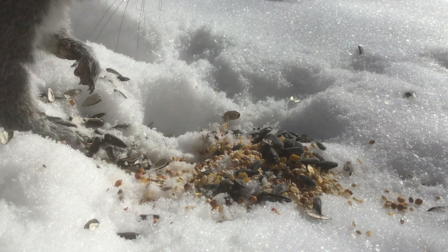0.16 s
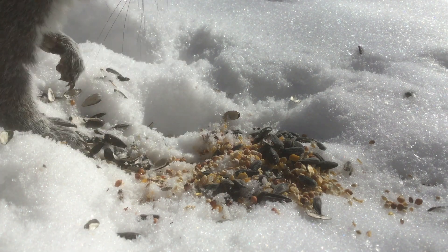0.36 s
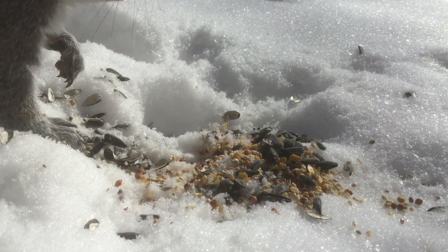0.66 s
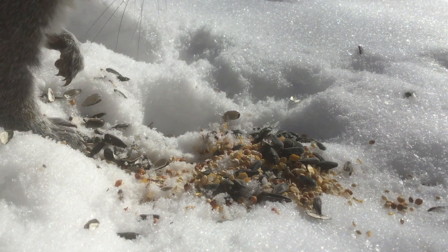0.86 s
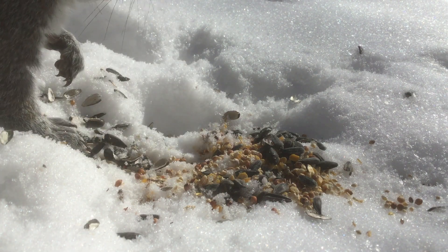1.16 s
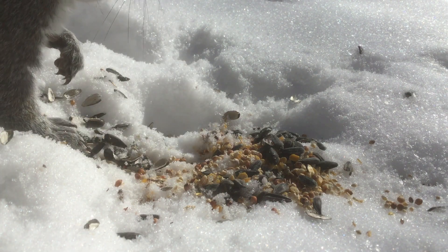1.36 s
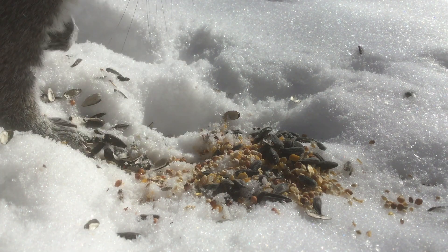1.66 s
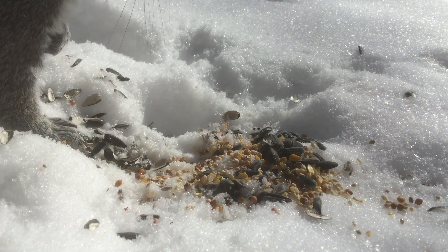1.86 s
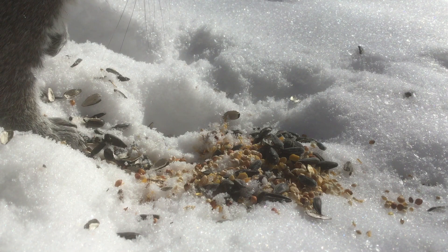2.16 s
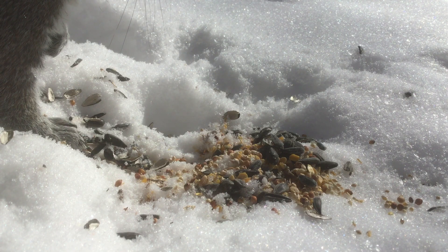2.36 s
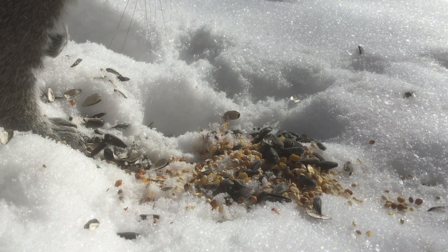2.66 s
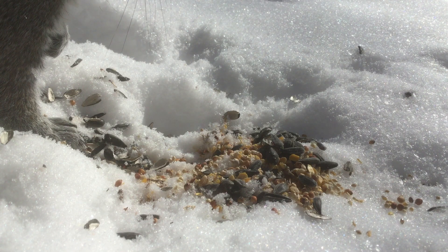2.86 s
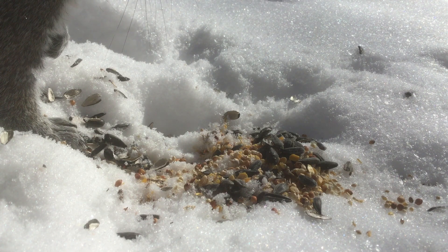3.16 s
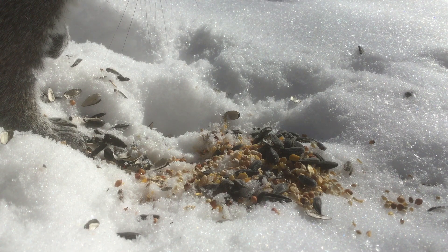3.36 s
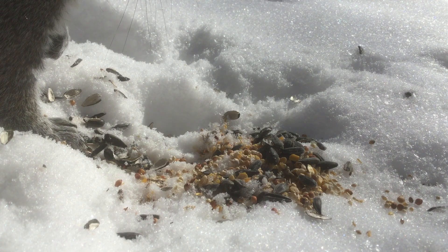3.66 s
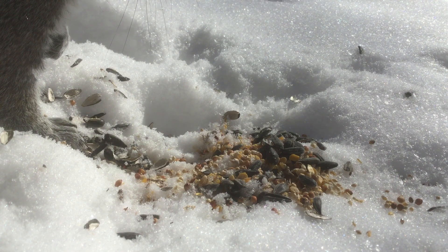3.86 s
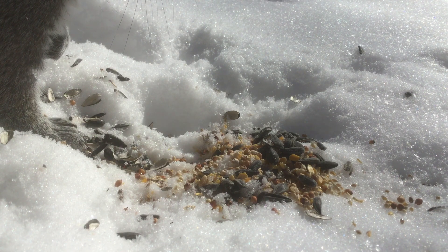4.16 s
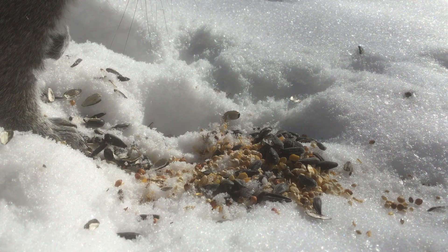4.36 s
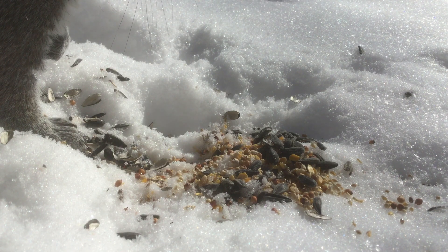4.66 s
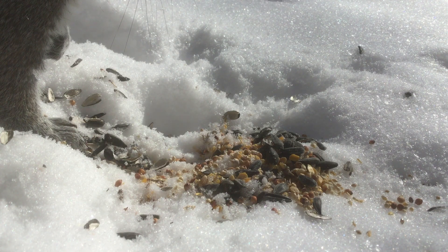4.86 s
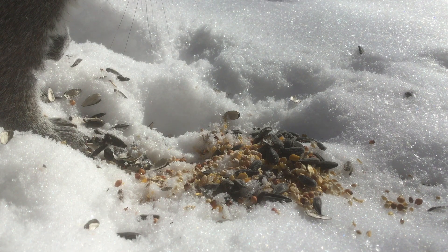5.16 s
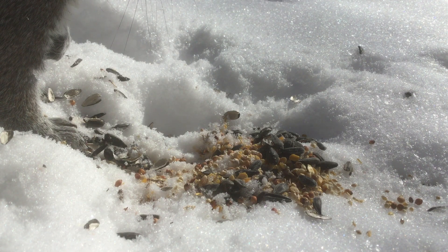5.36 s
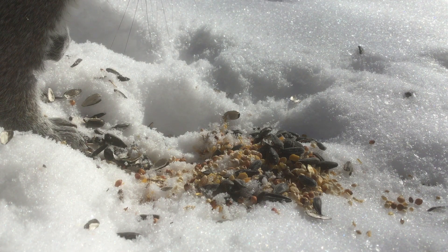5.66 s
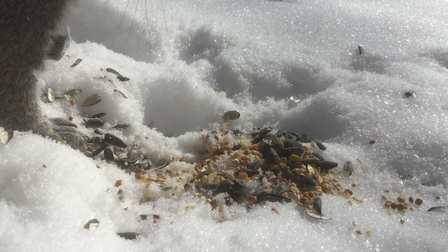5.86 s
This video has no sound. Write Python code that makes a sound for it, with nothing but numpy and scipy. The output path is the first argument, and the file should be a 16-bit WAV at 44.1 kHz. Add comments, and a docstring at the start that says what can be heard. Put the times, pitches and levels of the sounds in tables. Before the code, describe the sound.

Open air over snow, with the microphone right beside a feeding squirrel. A low, unsteady rumble with small wind puffs and a faint even hiss runs throughout. In the first 0.3 s husks snap and rustle, with a tiny high squeak; snow crunches faintly at 0.4. More light cracks and squeaks come at 0.7-1.2, with a short low peep at 1.0. A bird further off gives harsh arched chirps at 1.2-1.5. Soft squeaks and falling peeps follow at 1.7-2.2, then snaps at 2.3-2.5. From 3.1 to 3.75 feeding is busiest: sharp cracks, dry rustles, crust crunches and squeaks. A thin, very high bird note sounds at 3.8. Strong snaps at 4.07 meet a short, rough, low moan at 4.1-4.3. A crack and clearer squeak come at 4.45, a faint far note at 4.5, then near quiet until a final cluster of snaps, squeak and wind puff at 5.5-5.7.

```python
"""Out in the snow, the microphone right beside a squirrel feeding on seeds, birds calling further off.
High scooped squeaks, from a squirrel or a small bird, and lower peeps sound close by as arched whistles.
The squirrel moans once, a harmonic voice roughened by strain; husks snap and rustle under teeth and paws
and the crust crunches: bursts of tiny impacts ring resonances. Far birds chirp and pipe, built from sines.
Shaped noise lies under it all: a low outdoor rumble with puffs of wind, and a soft hiss."""
import sys
import numpy as np
from scipy import signal
from scipy.fft import rfft, irfft
from scipy.io import wavfile
from scipy.ndimage import uniform_filter1d, map_coordinates

SR = 44100
rng = np.random.default_rng(int(sys.argv[2]) if len(sys.argv) > 2 else 0)


def transcribe(u):
    """Save the signal u as a 16-bit wav file named by the first command-line argument.

    u: samples, shape (n,) or (channels, n), limited to [-1, 1]; the rate is SR.
    q: integer samples, one column per channel.
    """
    v = np.clip(np.atleast_2d(u).T, -1, 1)
    q = np.round(v * 32767).astype(np.int16)
    wavfile.write(sys.argv[1], SR, q)


N = 265482
TIME = np.arange(N) / SR
TOP_HZ = 16000  # upper limit of the recorder


def undb(db):
    """Decibels to gain."""
    return 10 ** (np.asarray(db) / 20)


def unit(x):
    """Scale to rms 1."""
    return x / np.sqrt(np.mean(x ** 2) + 1e-20)


def add(out, s, x):
    """Mix x into out at time s."""
    i = max(int(s * SR), 0)
    out[i:i + len(x)] += x[:len(out) - i]


def clock(length):
    """Times [s] from 0 through a sound of this length [s]."""
    return np.arange(int(length * SR)) / SR


def turn(hz):
    """Phase [rad] of an oscillation whose pitch follows hz."""
    return 2 * np.pi * np.cumsum(hz) / SR


def wander(n, rate):
    """Smooth chance from knots of spread 1, drawn rate times a second."""
    knots = np.arange(n) * rate / SR
    draws = rng.standard_normal(int(knots[-1]) + 3)
    return map_coordinates(draws, [knots], order=3, mode="nearest")


def gate(t, length, rise, fall):
    """A smooth opening and closing."""
    opening = np.sin(np.pi / 2 * np.clip(t / rise, 0, 1))
    closing = np.sin(np.pi / 2 * np.clip((length - t) / fall, 0, 1))
    return opening * closing


def colour(x, points):
    """Give x a spectrum of (Hz, dB) points with steep ends, at rms 1."""
    hz, db = np.transpose(points)
    f = np.maximum(np.fft.rfftfreq(len(x), 1 / SR), 1)
    gain = undb(np.interp(np.log(f), np.log(hz), db))
    gain = gain / (1 + (f / hz[-1] / 1.15) ** 16) / (1 + (hz[0] / f) ** 4)
    return unit(irfft(rfft(x) * gain, len(x)))


def ring(x, modes):
    """Pass x through (Hz, width, dB) resonances; a small body radiates little below its lowest one."""
    out = 0
    for hz, width, db in modes:
        b, a = signal.iirpeak(min(hz, TOP_HZ), hz / width, fs=SR)
        out = out + undb(db) * signal.lfilter(b, a, x)
    lowest = min(m[0] for m in modes)
    return signal.sosfilt(signal.butter(2, 0.87 * lowest, "high", fs=SR, output="sos"), out)


def piece(modes, scatter_share=0.38, narrowing=0.2, uneven_db=3):
    """One piece's own modes: three narrow ones scattered about each broad resonance."""
    chance = rng.standard_normal((len(modes), 3, 2))
    own = []
    for (hz, width, db), draws in zip(modes, chance):
        for k, (a, b) in enumerate(draws):
            own_hz = max(hz + width * (scatter_share * a + (k - 1) / 2), 200)
            own.append((own_hz, width * narrowing, db + uneven_db * b))
    return own


def grains(n, rate, spread_db):
    """Random tiny impacts of very unequal size, about rate of them a second."""
    sizes = undb(spread_db * np.minimum(rng.exponential(size=n), 4))
    return (rng.random(n) < rate / SR) * rng.choice([-1, 1], n) * sizes


def cloud(length, modes, rate, spread_db):
    """A short burst of grains that ring one piece with the given modes."""
    t = clock(length)
    burst = unit(ring(grains(len(t), rate, spread_db), piece(modes)))
    return burst * gate(t, length, 0.0018, 0.0053)


SCOOP_S = 0.00434  # decay time of the opening scoop
WHISTLE_ATTACK_S = 0.015  # at most; a very short whistle rises for half its length


def arch(t, scoop, sag, sag_bend=1.46):
    """Pitch as a share of its top: a quick scoop up, then a sag that steepens."""
    return 1 - scoop * np.exp(-t / SCOOP_S) - sag * (t / t[-1]) ** sag_bend


def whistle(t, hz, octave_db, under_db, rasp, waver=0.004, rasp_depth=0.026, rasp_rate=650,
            flutter_db=3.0, overtone_db=-14):
    """A thin whistle; when forced, the folds shake; it also sounds at thirds of the pitch."""
    hz = hz * (1 + waver * wander(len(t), 177) + rasp * rasp_depth * wander(len(t), rasp_rate))
    phase = turn(hz)
    # (multiple of the pitch, dB)
    partials = [(1, 0), (2, octave_db), (3, octave_db + overtone_db), (4, octave_db + 1.5 * overtone_db)]
    thirds = [(2 / 3, under_db - 7), (4 / 3, under_db - 9), (5 / 3, under_db)]
    voice = sum(undb(d) * np.sin(k * phase) for k, d in partials if k * hz.max() < TOP_HZ)
    slip = wander(len(t), 407)  # the undertones are only loosely locked to the pitch
    voice = voice + sum(undb(d) * np.sin(k * phase + slip) for k, d in thirds)
    flutter = undb(flutter_db * wander(len(t), 133))
    roughness = 1 + .5 * rasp * wander(len(t), rasp_rate)
    attack = min(WHISTLE_ATTACK_S, t[-1] / 2)
    return np.sqrt(2) * voice * flutter * roughness * gate(t, t[-1], attack, 0.0032)


# low rumble all round the microphone, spectrum shape: (frequency [Hz], relative level [dB])
RUMBLE_SPECTRUM = [(12, -67), (20, -37), (30, -39), (46, -8.5), (63, -2.5), (81, -1.5), (115, -3),
                   (155, -10), (189, -10.5), (286, -17), (370, -20), (506, -38.5), (600, -34.5), (780, -78),
                   (1320, -120)]
# soft even hiss of the open air, spectrum shape: (frequency [Hz], relative level [dB])
HISS_SPECTRUM = [(260, -28), (450, -1.5), (500, -4.5), (674, -1), (856, -7), (936, -7), (1040, -7),
                 (1240, -8.5), (2010, -12), (2400, -12), (3000, -12.5), (5300, -13), (5970, -15),
                 (12600, -15), (16000, -27.5)]
# strongest puffs of wind on the microphone: (time [s], rise of the rumble [dB])
WIND_PUFFS = [(.25, 7), (.615, 4), (0.824, 8.5), (0.969, 7), (1.228, 8.5), (1.835, 3.5), (2.742, 3),
              (5.64, 8.5), (5.69, 8)]
PUFF_WIDTH_S = 0.013  # from the peak to where the rise in dB is down to 1/e
RUMBLE_DB, HISS_DB, HISS_WALK_DB = -44, -59, .4


def outdoors(steadiness=0.15, swell_db=1.77, swell_rate=14):
    """A low rumble of noise that swells, sinks and puffs, under an even hiss."""
    rumble = colour(rng.standard_normal(N), RUMBLE_SPECTRUM)
    # partly even out the rumble's own power; it then stirs at random and now and then puffs
    power = uniform_filter1d(rumble ** 2, size=SR // 14)
    rumble = unit(rumble / power ** (steadiness / 2))
    puffs = sum(db * np.exp(-((TIME - s) / PUFF_WIDTH_S) ** 2) for s, db in WIND_PUFFS)
    hiss = colour(rng.standard_normal(N), HISS_SPECTRUM)
    hiss = hiss * undb(HISS_DB + HISS_WALK_DB * wander(N, 6.5))
    return rumble * undb(RUMBLE_DB + swell_db * wander(N, swell_rate) + puffs) + hiss


# loudest husks snapping, close by: (time [s], peak of the sharp edge [dB], peak of the shell's body [dB])
HUSK_SNAPS = [(0.061, -57.5, -40), (0.106, -30.5, -32), (.208, -31.5, -59), (.241, -29, -40),
              (.732, -36.5, -43), (1.02, -37, -35.5), (1.238, -33, -39.5), (2.286, -30.5, -61),
              (2.434, -31, -42), (2.484, -36.5, -52), (3.1497, -21.5, -60), (3.236, -31.5, -33.5),
              (3.267, -29, -45), (3.31, -37, -40.5), (3.401, -24, -61.5), (3.403, -20, -62),
              (3.534, -31, -32), (3.573, -39, -26), (3.596, -33.5, -30.5), (3.62, -39.5, -40),
              (3.658, -30, -28.5), (3.724, -29, -50), (3.734, -34, -50), (4.066, -23, -40),
              (4.075, -18.5, -57.5), (4.447, -35, -34), (5.506, -32.5, -40.5), (5.55, -32.5, -32),
              (5.5641, -25.5, -43), (5.572, -23.5, -31.5), (5.5865, -34, -42)]
# what a husk's body and edge ring with, before each piece scatters and narrows it:
# (frequency [Hz], width [Hz], level [dB])
HUSK_BODY = [(2273, 560, 5.5), (3387, 690, 6.5), (4760, 740, 0.5)]
HUSK_EDGE = [(6100, 1400, -4), (8810, 410, 8), (9550, 1050, 1), (11930, 2440, 4.5)]


def snaps(tear_s=0.00026, after_s=0.0055, after_db=-20, onset_s=0.00034):
    """Each husk splits in a run of tiny fractures, then crumbles briefly; edge and body ring."""
    out, t = np.zeros(N), np.arange(SR // 30) / SR
    force = np.exp(-t / tear_s) + undb(after_db) * np.exp(-t / after_s)
    force = force * (1 - np.exp(-t / onset_s))
    for s, edge_db, body_db in HUSK_SNAPS:
        fractures = rng.laplace(size=(2, len(t))) * force
        edge = ring(fractures[0], piece(HUSK_EDGE))
        body = ring(fractures[1], piece(HUSK_BODY))
        add(out, s, undb(edge_db) * edge / np.abs(edge).max())
        add(out, s, undb(body_db) * body / np.abs(body).max())
    return out


# high scooped squeaks close to the microphone, from a squirrel or a small bird:
# (time [s], length [s], top pitch [Hz], level [dB], octave against the fundamental [dB])
HIGH_SQUEAKS = [(0.156, 0.0623, 6060, -57, 0), (0.807, 0.026, 6080, -65, 14.5),
                (1.022, 0.041, 6070, -50, -1.5), (1.663, 0.052, 6000, -54.5, 3),
                (2.158, .047, 5720, -51, 1.5), (2.420, .044, 5980, -49.5, 1.5), (2.766, .056, 6100, -51, 0),
                (3.098, 0.033, 5990, -49.5, 4.5), (3.361, .035, 5960, -51.5, 2),
                (3.652, 0.031, 5860, -45, 1), (3.978, 0.082, 5980, -46.5, 5),
                (4.444, 0.038, 5494, -39.5, -6), (5.511, 0.055, 5565, -42.5, -3)]
# each scoops up towards its top, then sags part of the way to rest; rasp brings up the undertones
SCOOP_SHARE, SAG_SHARE, SQUEAK_REST_HZ = 0.178, .52, 4866
CLEAN_HZ, RASP_PER_KHZ = 5330, 0.79  # rasp grows with the top pitch above CLEAN_HZ, up to 1
UNDERTONE_DB, UNDERTONE_RASP_DB = -15, 10


def squeaks():
    """High arched whistles; the higher they reach, the further they sag and the more they rasp."""
    out = np.zeros(N)
    for s, length, top, db, octave_db in HIGH_SQUEAKS:
        t = clock(length)
        rasp = np.clip(RASP_PER_KHZ * (top - CLEAN_HZ) / 1000, 0, 1)
        hz = top * arch(t, SCOOP_SHARE, SAG_SHARE * (1 - SQUEAK_REST_HZ / top))
        under_db = UNDERTONE_DB + UNDERTONE_RASP_DB * rasp
        add(out, s, undb(db) * whistle(t, hz, octave_db, under_db, rasp))
    return out


# bouts of paws and teeth working in the seeds, close by:
# (time [s], length [s], crackling husks [dB], shifting seeds [dB])
SEED_RUSTLES = [(0.213, 0.047, -51.5, -58), (.839, 0.062, -58, -64.5), (2.255, 0.052, -49.5, -63),
                (2.426, 0.043, -47.5, -65), (2.885, 0.051, -57, -65), (3.134, 0.043, -42.5, -67),
                (3.193, .14, -55, -61), (3.396, .07, -50.5, -84), (3.5, 0.11, -58, -55),
                (3.651, 0.046, -46, -48.5), (3.721, 0.013, -55, -49), (4.061, 0.067, -52, -71),
                (4.434, 0.057, -46.5, -60), (5.54, 0.042, -46, -54.5)]


def rustles(rate=1500, spread_db=5):
    """Clouds of grains ring the husks' edges and, duller, the seeds."""
    out = np.zeros(N)
    for s, length, husks_db, seeds_db in SEED_RUSTLES:
        add(out, s, undb(husks_db) * cloud(length, HUSK_EDGE, rate, spread_db))
        add(out, s, undb(seeds_db) * cloud(length, HUSK_BODY, rate, spread_db))
    return out


# paws pressing the snow crust: (time [s], length [s], level [dB])
SNOW_STEPS = [(0.391, 0.071, -54.5), (2.895, 0.048, -57), (3.187, 0.047, -48.5), (3.435, 0.032, -49),
              (3.531, .04, -47.5)]
# what the crust rings with, before each step scatters and narrows it:
# (frequency [Hz], width [Hz], level [dB])
CRUST_MODES = [(384, 22.6, 20.5), (716, 127, -6.5), (1163, 187, -2)]


def steps(rate=2200, spread_db=4):
    """The snow crust gives way grain by grain."""
    out = np.zeros(N)
    for s, length, db in SNOW_STEPS:
        add(out, s, undb(db) * cloud(length, CRUST_MODES, rate, spread_db))
    return out


# short falling peeps, far below the squeaks in pitch: (time [s], length [s], top pitch [Hz], level [dB])
LOW_PEEPS = [(1.016, 0.0143, 2043, -43), (1.667, 0.056, 1880, -53.5), (1.896, 0.043, 1790, -56),
             (2.142, .047, 1747, -55.5), (4.011, 0.019, 2380, -51.5)]
PEEP_SCOOP_SHARE, PEEP_SAG_SHARE, PEEP_RASP = 0.092, 0.216, .2
PEEP_OCTAVE_DB, PEEP_UNDERTONE_DB = -8, -6


def peeps():
    """Low whistles that fall away steeply."""
    out = np.zeros(N)
    for s, length, top, db in LOW_PEEPS:
        t = clock(length)
        hz = top * arch(t, PEEP_SCOOP_SHARE, PEEP_SAG_SHARE)
        add(out, s, undb(db) * whistle(t, hz, PEEP_OCTAVE_DB, PEEP_UNDERTONE_DB, PEEP_RASP))
    return out


# harsh chirps of the nearer bird, further off than the feeding:
# (time [s], length [s], length of the opening arch [s], top pitch [Hz], level [dB], full rasp [0-1])
BIRD_CHIRPS = [(1.217, 0.092, 0.048, 3354, -43, 0.85), (1.287, 0.018, .016, 3330, -41.5, 1),
               (1.371, 0.11, .099, 3724, -38.5, 0.27)]
# their harmonics before rasp brightens them: (multiple of the pitch, level [dB])
CHIRP_PARTIALS = [(1, -2), (2, -10), (3, -19.5), (4, -22)]
# each arches up from one resting pitch and drops back to it, growing louder and hoarser
CHIRP_REST_HZ, CHIRP_ARCH_SKEW = 2760, 1.8
CHIRP_ATTACK_SHARE, CHIRP_HOARSEN_SHARE = 0.5, 0.47  # shares of the length
CHIRP_RELEASE_S = 0.0048


def chirps(rasp_depth=0.086, rasp_rate=1100, flutter_db=2, echo_db=-6, echo_s=0.0091, harsh_db=11):
    """Arched calls that grow bright and hoarse when forced, doubled by a near surface."""
    out = np.zeros(N)
    for s, length, arch_s, top, db, full_rasp in BIRD_CHIRPS:
        t = clock(length)
        rise = np.sin(np.pi * np.minimum(t / arch_s, 1) ** CHIRP_ARCH_SKEW)
        hz = CHIRP_REST_HZ + (top - CHIRP_REST_HZ) * rise
        rasp = full_rasp * np.minimum(t / (CHIRP_HOARSEN_SHARE * length), 1)
        phase = turn(hz * (1 + rasp_depth * rasp * wander(len(t), rasp_rate)))
        voice = sum(undb(d + harsh_db * rasp * (k > 1)) * np.sin(round(k) * phase)
                    for k, d in CHIRP_PARTIALS)
        loudness = np.sqrt(2) * undb(db + flutter_db * wander(len(t), 354))
        voice = voice * loudness * gate(t, length, CHIRP_ATTACK_SHARE * length, CHIRP_RELEASE_S)
        add(out, s, voice)
        add(out, s + echo_s, undb(echo_db) * voice)
    return out


# the far bird's notes: (time [s], length [s], pitch [Hz], level [dB])
FAR_NOTES = [(3.769, 0.035, 7430, -48), (4.537, .022, 8260, -62)]


def far_bird(waver=0.013):
    """Thin, level, very high notes: sines with a slight waver of pitch."""
    out = np.zeros(N)
    for s, length, hz, db in FAR_NOTES:
        t = clock(length)
        phase = turn(hz * (1 + waver * wander(len(t), 196)))
        add(out, s, np.sqrt(2) * undb(db) * np.sin(phase) * gate(t, length, 0.0064, 0.018))
    return out


# the moaning throat, overtones before strain brightens them: (multiple of the pitch, level [dB])
THROAT_PARTIALS = [(1, 3), (2, -9), (3, -8), (4, -20), (5, -33), (6, -24), (7, -42)]
# effort builds, holds and lets go; pitch rises with it, and the voice is rough while effort is low
MOAN_S, MOAN_LENGTH_S, MOAN_DB = 4.1, .205, -42.5
MOAN_SLACK_HZ, MOAN_FULL_HZ, MOAN_BUILD_S, MOAN_LET_GO_S = 354, 415.4, 0.0684, 0.078


def moan(jitter=0.078, shimmer_db=3, fizz_db=-20, strain_db=6, overtone_db=-5, least_strain=0.31):
    """A low whine with a faint fizz once a cycle; strain makes it brighter and rougher."""
    t = clock(MOAN_LENGTH_S)
    effort = gate(t, MOAN_LENGTH_S, MOAN_BUILD_S, MOAN_LET_GO_S)
    hz = MOAN_SLACK_HZ + (MOAN_FULL_HZ - MOAN_SLACK_HZ) * effort
    strain = 1 - (1 - least_strain) * effort
    phase = turn(hz * (1 + jitter * strain * wander(len(t), 264)))
    brightness_db = overtone_db + strain_db * strain
    voice = unit(sum(undb(d + (k > 1) * brightness_db) * np.cos(round(k) * phase)
                     for k, d in THROAT_PARTIALS))
    noise = ring(rng.standard_normal(len(t)), [(9150, 910, -6.5), (12600, 1100, 2)])
    fizz = unit(noise * (1 + np.cos(phase)) ** 2)
    loudness = undb(MOAN_DB + shimmer_db * strain * wander(len(t), 253))
    loudness = loudness * gate(t, MOAN_LENGTH_S, 0.0099, 0.057)
    out = np.zeros(N)
    add(out, MOAN_S, (voice + undb(fizz_db) * fizz) * loudness)
    return out


def scatter(x, wet_db, t60):
    """Short diffuse echoes from the surroundings: a decaying tail of noise."""
    t = np.arange(SR // 2) / SR
    tail = rng.standard_normal(len(t)) * undb(-60 * t / t60) * np.clip(t / .006, 0, 1)
    return x + undb(wet_db) * signal.fftconvolve(x, tail / np.linalg.norm(tail))[:N]


def lowpass(x, hz):
    """Roll off the treble gently above hz."""
    return signal.sosfilt(signal.butter(2, hz, fs=SR, output="sos"), x)


def scene():
    """Feeding and near voices close by, the birds further off, the rumble all round."""
    voices = scatter(squeaks() + peeps() + moan(), wet_db=-9.5, t60=0.14)
    feeding = scatter(snaps() + rustles() + steps(), wet_db=-12.5, t60=0.23)
    birds = scatter(chirps() + far_bird(), wet_db=-8, t60=0.3)
    birds = lowpass(birds, 12900)  # distance dulls the birds
    # the microphone softens the highest treble
    animals = lowpass(voices + feeding + birds, TOP_HZ - 1000)
    return (animals + outdoors())[None]


def record(dry):
    """The recorder cuts the top steeply."""
    return signal.sosfilt(signal.ellip(10, .2, 80, TOP_HZ, fs=SR, output="sos"), dry)


dry = scene()
out = record(dry)
transcribe(out)
```